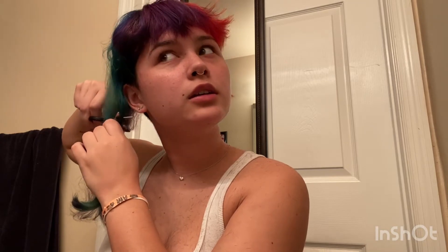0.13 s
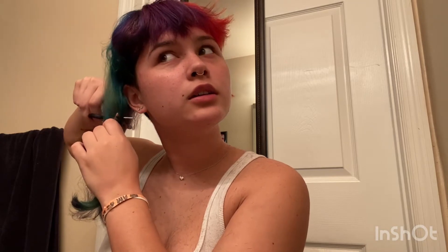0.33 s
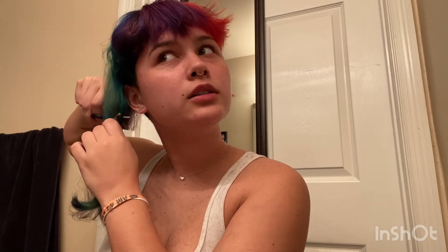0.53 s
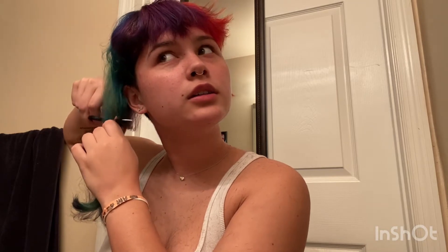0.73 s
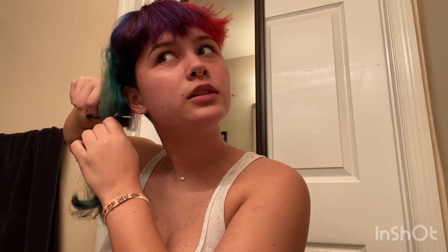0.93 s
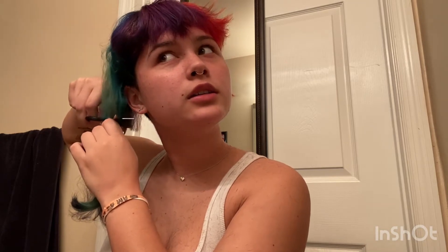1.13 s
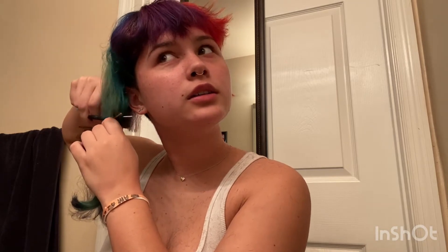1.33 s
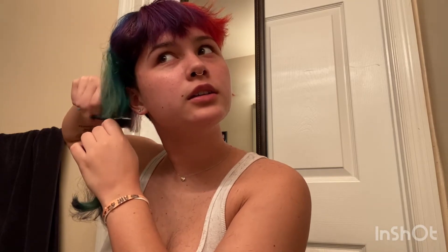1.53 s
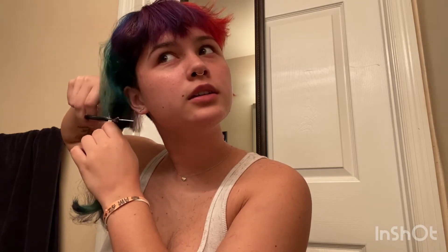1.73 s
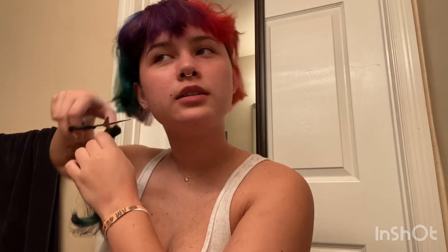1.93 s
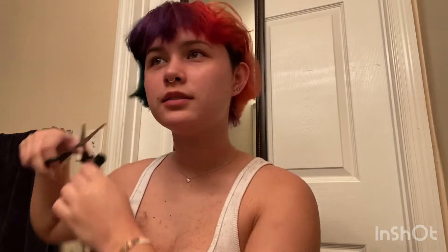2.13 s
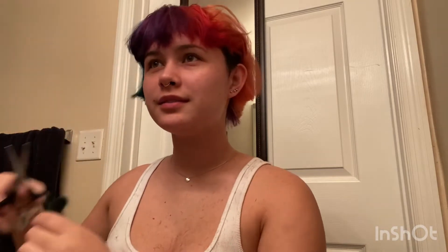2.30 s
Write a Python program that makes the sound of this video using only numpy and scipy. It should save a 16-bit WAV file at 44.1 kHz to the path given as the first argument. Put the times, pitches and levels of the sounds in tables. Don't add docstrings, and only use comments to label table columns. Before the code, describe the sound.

Close, dry scissor strokes crunch through hair at irregular intervals, the blades click shut hard, a pause follows with soft rustling and low thumps, then a last short snap; a fan hums quietly in a small hard room.

```python
import sys
import numpy as np
from scipy import signal
from scipy.fft import rfft, irfft, next_fast_len
from scipy.io import wavfile
from scipy.ndimage import uniform_filter1d

SR = 44100
rng = np.random.default_rng(int(sys.argv[2]) if len(sys.argv) > 2 else 0)


def master_out(mix):
    frames = np.transpose(np.atleast_2d(mix))
    ceiling = np.clip(frames, -1, 1)
    pcm = np.round(ceiling * 32767).astype(np.int16)
    wavfile.write(sys.argv[1], SR, pcm)


def convert_level_to_amplitude(level_db):
    exponent = np.asarray(level_db, float) / 20
    return 10 ** exponent


N = 108574


def in_time(rows):
    return np.interp(np.arange(N) / SR, *np.transpose(rows))


def at_hz(points, hz):
    points_hz, values = np.transpose(points)
    return np.interp(np.log(hz + 1), np.log(points_hz), values)


def rms_one(x):
    return x / np.sqrt(np.mean(x ** 2) + 1e-20)


def colour(x, spectrum):
    gain = convert_level_to_amplitude(at_hz(spectrum, np.fft.rfftfreq(N, 1 / SR)))
    return rms_one(irfft(rfft(x) * gain, N))


def drift(rate_hz):
    r = np.exp(-2 * np.pi * rate_hz / SR)
    settled = signal.lfilter([1], [1, -2 * r, r * r], rng.standard_normal(N + SR))[SR:]
    return rms_one(settled)


def resonance(x, hz, width_hz):
    r = np.exp(-np.pi * width_hz / SR)
    peak = (1 - r * r) / 2
    return signal.lfilter([peak, 0, -peak], [1, -2 * r * np.cos(2 * np.pi * hz / SR), r * r], x)


def twice_resonant(x, hz, width_hz):
    return resonance(resonance(x, hz, width_hz), hz, 2 * width_hz)


# hz [Hz], likeness [0 to 1]
FAR_LIKENESS = [(100, 0.65), (250, 0.49), (600, 0.05), (5500, 0.071), (7900, 0.94), (9900, 1), (11900, 1),
                (13500, 1)]
NEAR_LIKENESS = [(600, 0.69), (2200, 0.23), (3600, 0.055), (5500, 0.078), (7900, 0.98), (9900, 1),
                 (11700, 0.23), (13500, 0.94)]
# hz [Hz], lag_rad [rad]
PORT_LAG = [(9600, 0.15), (11000, 1.3), (11700, 1.24), (12700, 1.4), (13500, 3.12)]


def ports(three, likeness):
    size = next_fast_len(N + 4096)
    hz = np.fft.rfftfreq(size, 1 / SR)
    alike = np.clip(at_hz(likeness, hz), 0, 1)
    turn = np.exp(0.5j * at_hz(PORT_LAG, hz))
    parts = rfft(three, size)
    shared = parts[0] * np.sqrt(alike) * [turn, 1 / turn]
    own = parts[1:] * np.sqrt(1 - alike)
    return irfft(shared + own, size)[:, :N]


# mode_hz [Hz], width_hz [Hz], level_db [dB]
BLADES = [(995, 13.8, 3.5), (2085, 24, 6.5), (2360, 71, 6.), (5130, 23, -2), (5405, 37, 11.5),
          (6070, 55, 5), (6500, 51, 6.5), (6880, 31, 2), (7540, 54, 7.), (8320, 40, 7.5), (9000, 66, 3),
          (9520, 55, 6), (10080, 70, 4.5), (10900, 54, 6.)]
# mode_hz [Hz], width_hz [Hz], level_db [dB]
BODY = [(1017, 700, -1), (1500, 133, -1), (1948, 640, 0.5), (2497, 620, -6.5)]
HAIRS_PER_S, HAIR_SPREAD_DB, HAIR_CLUMP_DB = 5000, 2, 2.5
SLIDE_DB = -0.5
SHEEN_WIDTH_HZ, SHEEN_DB = 500, -4.5
SHEAR_HZ, SHEAR_WIDTH_HZ = 14300, 1100
RELEASE_S = 0.017


def snapping_hairs():
    sizes = convert_level_to_amplitude(HAIR_SPREAD_DB * np.minimum(rng.exponential(1, N), 5))
    chance = HAIRS_PER_S * convert_level_to_amplitude(HAIR_CLUMP_DB * drift(150)) / SR
    snaps = sizes * (rng.random(N) < chance)
    snap_power = uniform_filter1d(rms_one(snaps) ** 2, size=9).clip(0)
    grain = np.sqrt(snap_power + convert_level_to_amplitude(2 * SLIDE_DB)) * rng.standard_normal((3, N))
    ringing = sum(convert_level_to_amplitude(db) * resonance(grain, hz, width_hz) for hz, width_hz, db in BLADES)
    return rms_one(grain + ringing)


def cuts(rows, spectrum, shear_db, attack_s):
    grain, t, out = snapping_hairs(), np.arange(N) / SR, np.zeros((3, N))
    hiss = colour(grain, spectrum)
    hiss = hiss + convert_level_to_amplitude(shear_db) * resonance(hiss, SHEAR_HZ, SHEAR_WIDTH_HZ)
    body = rms_one(sum(convert_level_to_amplitude(db) * twice_resonant(grain, hz, width_hz) for hz, width_hz, db in BODY))
    for start_s, length_s, level_db, sheen_hz, body_db in rows:
        rise = np.clip((t - start_s) / min(attack_s, 0.57 * length_s), 0, 1)
        shape = rise * np.exp(-np.maximum(t - start_s - length_s, 0) / RELEASE_S)
        bright = rms_one(hiss + convert_level_to_amplitude(SHEEN_DB) * resonance(hiss, sheen_hz, SHEEN_WIDTH_HZ))
        out += convert_level_to_amplitude(level_db) * shape * (bright + convert_level_to_amplitude(body_db) * body)
    return out


# start_s [s], length_s [s], level_db [dB], sheen_hz [Hz], body_db [dB]
STROKES = [(0.0, 0.081, -51.5, 9800, -7.), (0.19, 0.033, -75, 9000, -8), (.24, 0.0067, -82, 9000, -12.),
           (0.317, 0.09, -53.5, 9850, -7.), (0.49, 0.053, -75, 9000, -7), (.632, 0.069, -51, 7700, -8),
           (1.027, 0.036, -69, 6500, -12.), (1.059, 0.099, -54, 6800, -7.5),
           (1.228, 0.035, -75.5, 7140, -6), (1.366, 0.023, -56., 6560, -8.),
           (1.385, 0.057, -50.5, 6500, -6.5), (2.228, 0.027, -66.5, 4700, -18),
           (2.251, 0.035, -61, 6500, -9.5)]
# hz [Hz], density_db [dB per Hz]
HAIR = [(600, -82), (3600, -11.5), (4600, 2), (6900, -1.5), (8200, -3), (9700, -2.5), (11500, -14.5),
        (13200, -16)]


def strokes():
    return cuts(STROKES, HAIR, shear_db=19, attack_s=0.031)


# hz [Hz], t60_s [s]
ROOM_T60 = [(500, 0.17), (2000, 0.31), (6000, 0.38), (14000, .25)]
ROOM_GAP_S = 0.0015


def bathroom(x):
    out, white = 0, rng.standard_normal((2, 3, N))
    for k, low_hz in enumerate(500 * 2. ** np.arange(0, 5, 1 / 6)):
        band = signal.butter(2, [low_hz, low_hz * 2 ** (1 / 6)], "band", fs=SR, output="sos")
        keep = convert_level_to_amplitude(-120 / at_hz(ROOM_T60, low_hz * 1.06) / SR)
        fill = np.exp(-1 / ROOM_GAP_S / SR)
        fed = signal.sosfilt(band, x) ** 2
        energy = signal.lfilter([(1 - keep) * (1 - fill)], np.convolve([1, -keep], [1, -fill]), fed)
        out = out + np.sqrt(energy.clip(0)) * rms_one(signal.sosfilt(band, white[k % 2]))
    return out


# time_s [s], level_db [dB]
BOOM = [(0.0, -69), (0.36, -52), (0.6, -71), (0.66, -52.5), (0.81, -49.5), (0.88, -61), (0.98, -47),
        (1.06, -62), (1.1, -46.5), (1.36, -62), (1.82, -59.5), (1.84, -65), (1.96, -43), (2.16, -37.5),
        (2.34, -58.5), (2.46, -51)]
# hz [Hz], density_db [dB per Hz]
AIR = [(20, -8), (45, 4), (150, -4), (340, -14), (500, -25), (1400, -37), (9000, -58), (15000, -56)]
# mode_hz [Hz], width_hz [Hz], level_db [dB]
DUCT = [(135.2, 8.3, -59.5), (246.3, 26, -71.), (331.1, 20, -73), (356.2, 21.4, -76.5), (810, 92, -83)]
HUM_HZ, HUM_DB, HUM_WOBBLE_DB, OVERTONE_DB = 119.4, -48, 0.46, -75
BOOM_HZ, BOOM_WIDTH_HZ = 67.77, 12.8
AIR_DB, DUCT_PATCHY_DB = -57, 1.8


def fan():
    turn = 2 * np.pi * HUM_HZ * np.arange(N) / SR
    hum = convert_level_to_amplitude(HUM_DB + HUM_WOBBLE_DB * drift(15)) * np.sin(turn + 1.72)
    hum = np.sqrt(2) * (hum + convert_level_to_amplitude(OVERTONE_DB) * np.sin(2 * turn))
    swing = 2 * np.pi * np.cumsum(BOOM_HZ + 0.188 * BOOM_WIDTH_HZ * drift(5)) / SR
    boom = convert_level_to_amplitude(in_time(BOOM) + 1.5 * drift(23)) * np.sqrt(2) * np.sin(swing)
    air = convert_level_to_amplitude(AIR_DB) * colour(rng.standard_normal((3, N)), AIR)
    white = rng.standard_normal((3, N))
    for hz, width_hz, db in DUCT:
        air += convert_level_to_amplitude(db) * rms_one(twice_resonant(white, hz, width_hz)) * convert_level_to_amplitude(DUCT_PATCHY_DB * drift(3.1))
    return ports(air, FAR_LIKENESS) + hum * convert_level_to_amplitude([[.2], [-.2]]) + boom * convert_level_to_amplitude([[.4], [-.4]])


# hz [Hz], density_db [dB per Hz]
CRUNCH = [(600, -63), (1300, -20), (2000, -8.5), (3600, 10), (5500, 3.5), (8500, 2.5), (11000, -3.5),
          (13000, 1)]
# start_s [s], length_s [s], level_db [dB], sheen_hz [Hz], body_db [dB]
JOLTS = [
    (.831, 0.014, -61., 3700, -10.5),
    (2.317, 0.034, -55., 5700, -6),
    (2.407, 0.021, -63, 3900, -9),
]


def jolts():
    return cuts(JOLTS, CRUNCH, shear_db=-12, attack_s=0.0042)


# start_s [s], peak_db [dB], centre_hz [Hz], width_hz [Hz], t60_s [s]
CLICKS = [
    (0.833, -53.5, 5530, 6030, 0.016),
    (1.4425, -33.5, 11000, 7050, .012),
    (1.4465, -30.5, 4200, 890, .009),
    (2.2532, -46, 7500, 12200, 0.0098),
    (2.3152, -27.5, 6300, 5330, 0.0044),
    (2.4095, -52, 5100, 7000, 0.0061),
]
# start_s [s], peak_db [dB], pitch_hz [Hz], t60_s [s]
KNOCKS = [
    (0.833, -47., 2140, 0.015),
    (2.254, -59, 1830, .008),
    (2.3156, -39.5, 1860, 0.0068),
]
BOUNCE_S, BOUNCE_DB, KNOCK_RISE_S = 0.001037, -14.5, 0.0011


def clicks():
    out, t = np.zeros(N + SR), np.arange(SR // 20) / SR
    for start_s, peak_db, hz, width_hz, t60_s in CLICKS:
        crack = rng.standard_normal(len(t)) * convert_level_to_amplitude(-60 * t / t60_s)
        crack = resonance(resonance(crack, hz, width_hz), hz, width_hz)
        crack = crack + convert_level_to_amplitude(BOUNCE_DB) * np.roll(crack, int(BOUNCE_S * SR))
        out[int(start_s * SR):][:len(t)] += convert_level_to_amplitude(peak_db) * crack / abs(crack).max()
    for start_s, peak_db, pitch_hz, t60_s in KNOCKS:
        mode = np.sin(2 * np.pi * pitch_hz * t) * convert_level_to_amplitude(-60 * t / t60_s)
        out[int(start_s * SR):][:len(t)] += convert_level_to_amplitude(peak_db) * 2 * mode * (1 - np.exp(-t / KNOCK_RISE_S))
    return signal.sosfilt(signal.butter(4, 1400, "high", fs=SR, output="sos"), out[:N])


# start_s [s], length_s [s], level_db [dB], sheen_hz [Hz], body_db [dB]
CRUNCHES = [
    (1.42, 0.047, -45.5, 4960, -26),
    (1.5, 0.057, -54.5, 4330, -8.5),
]


def crunches():
    return cuts(CRUNCHES, CRUNCH, shear_db=-6, attack_s=0.031)


# time_s [s], level_db [dB]
RUSTLE = [
    (1.84, -88),
    (1.95, -76),
    (2.05, -66.5),
    (2.13, -70.5),
    (2.22, -82.5),
    (2.3, -101),
]
# hz [Hz], density_db [dB per Hz]
RUSTLE_COLOUR = [(900, -20), (2500, -3.5), (5000, -4.5), (8500, -1.5), (12400, -5.5), (15800, -26)]


def rustle():
    level = convert_level_to_amplitude(in_time(RUSTLE) + 1.2 * drift(28))
    return level * colour(rng.standard_normal((3, N)), RUSTLE_COLOUR)


ROOM_DB, CLICK_ROOM_DB = -3, -1.5
CLICK_LAG_S = 0.00016


def scene():
    hair = strokes() + jolts() + crunches() + rustle()
    hits = clicks()
    late = np.roll(hits, int(CLICK_LAG_S * SR))
    wet = convert_level_to_amplitude(ROOM_DB) * bathroom(hair[0] + convert_level_to_amplitude(CLICK_ROOM_DB) * hits)
    direct = hair + np.array([hits, hits, late])
    return ports(direct, NEAR_LIKENESS) + ports(wet, FAR_LIKENESS) + fan()


def roll_off(x):
    return signal.sosfilt(signal.butter(12, 15950, fs=SR, output="sos"), x)


def record(dry):
    return roll_off(dry)


dry = scene()
out = record(dry)
master_out(out)
```